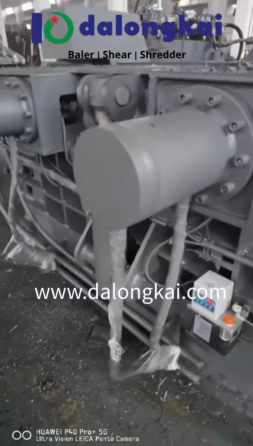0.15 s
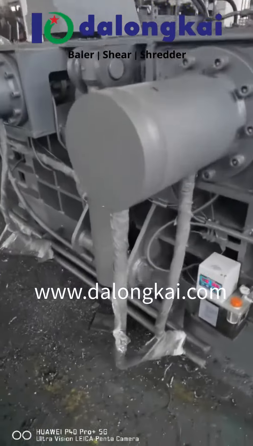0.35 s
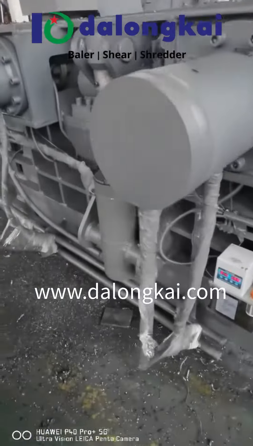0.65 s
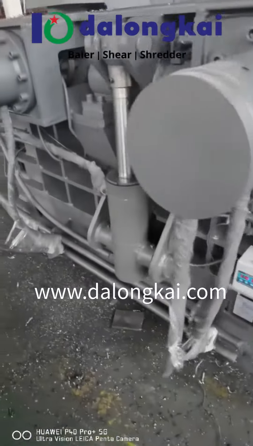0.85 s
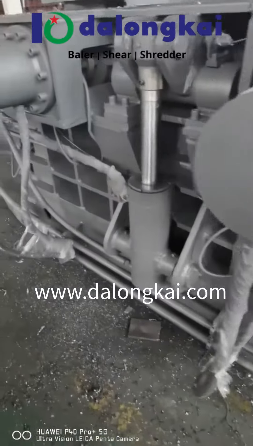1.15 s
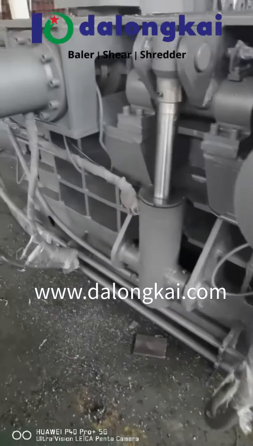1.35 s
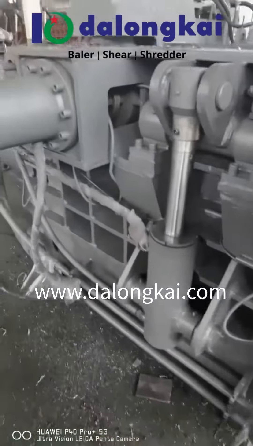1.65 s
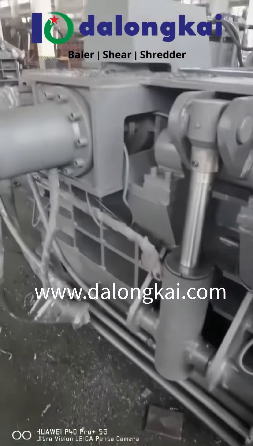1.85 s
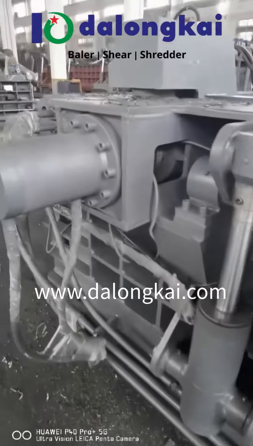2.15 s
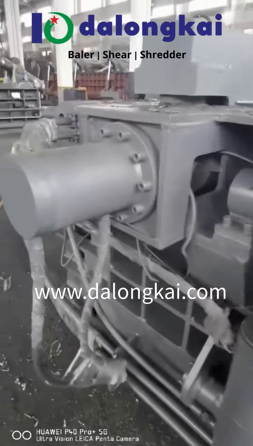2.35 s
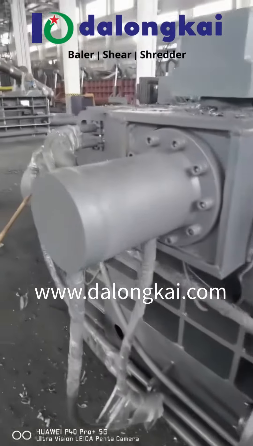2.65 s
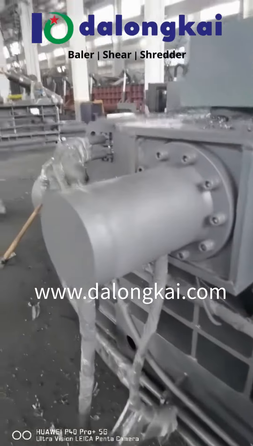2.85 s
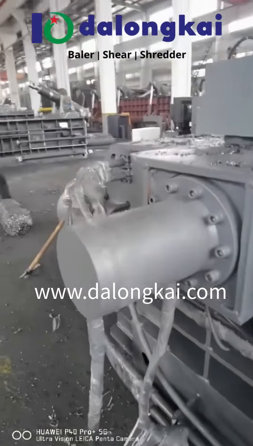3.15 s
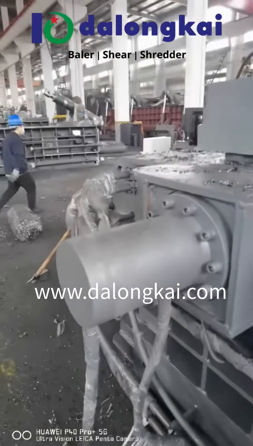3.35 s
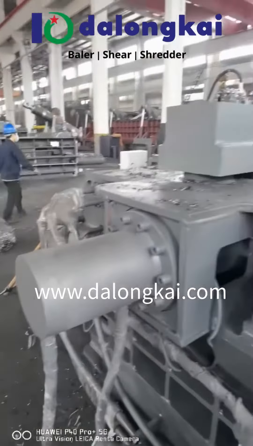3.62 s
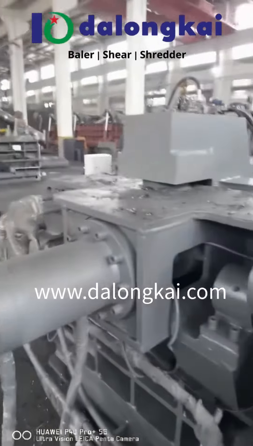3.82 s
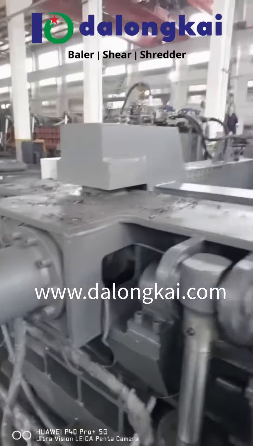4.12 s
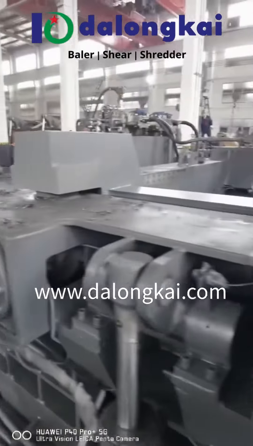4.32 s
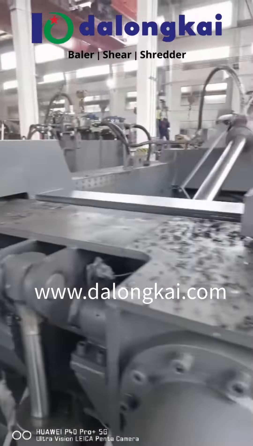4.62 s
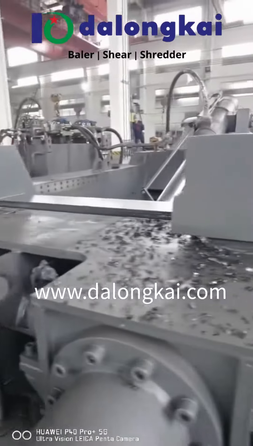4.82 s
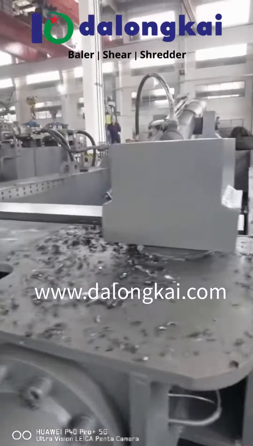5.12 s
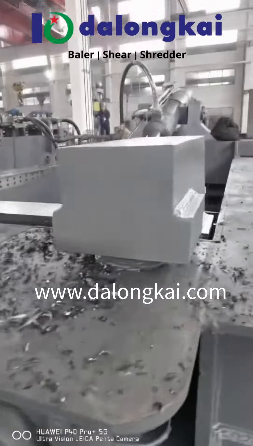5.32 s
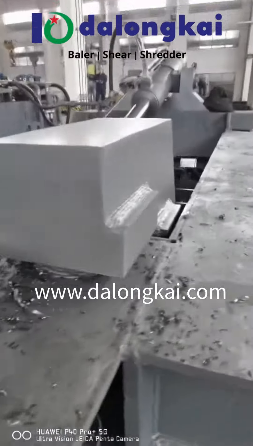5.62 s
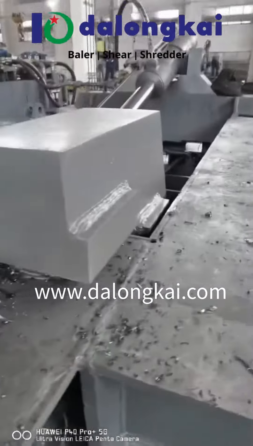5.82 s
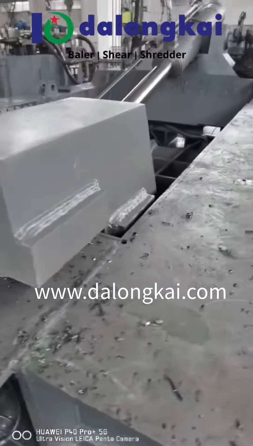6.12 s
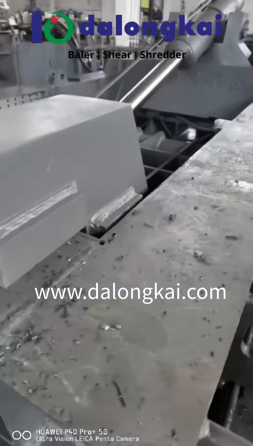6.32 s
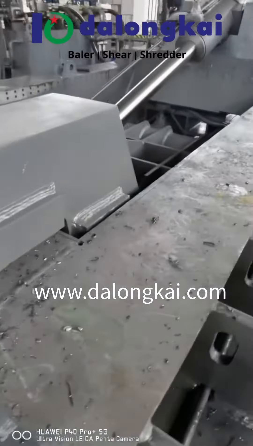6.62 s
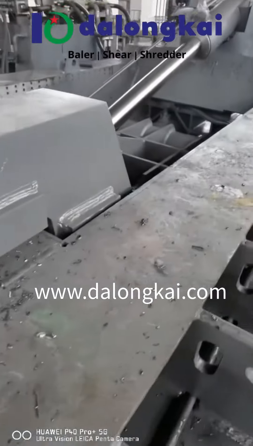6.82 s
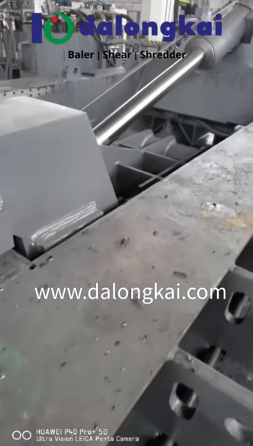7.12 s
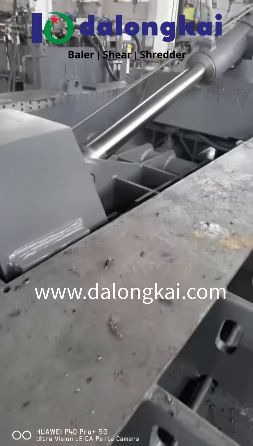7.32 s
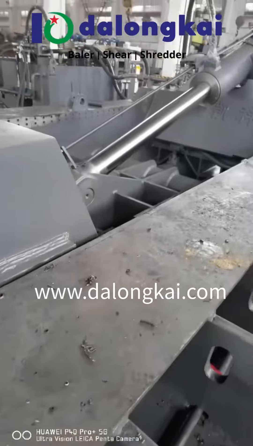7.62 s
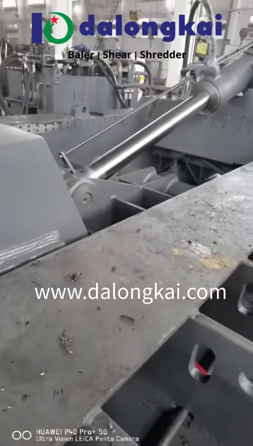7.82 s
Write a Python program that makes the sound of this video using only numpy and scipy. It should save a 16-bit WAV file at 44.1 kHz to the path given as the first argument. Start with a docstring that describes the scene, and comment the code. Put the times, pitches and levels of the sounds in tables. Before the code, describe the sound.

A hydraulic pump whines throughout at one fairly low, unchanging pitch with buzzing overtones, over the soft, dark roar of a large factory hall. As the microphone moves, the whine swells and fades and its overtones shimmer. It dips around 1 second, stays mostly strong from 1.5 to 5.7, drops briefly at 6, returns, then sinks from about 7 before rising at the very end.

At the start, a faint, high ring of steel dies away within a second or two. Shoes crunch on metal chips with small, bright snaps and scuffs right at the beginning and near 1.1, 1.7 and 2.1 seconds, more faintly near 2.6 and 5.2, and again just after 6. A soft, distant hiss runs until about 2.2 seconds, fades into the hall, and builds again from 5.5 seconds to the end.

```python
"""Hydraulic pump in a steel hall

A nine-piston pump whines at constant speed. The listener walks through its standing waves, so every
overtone swells and fades on its own. Shoes crunch on metal chips, struck steel rings away, and a far
hiss stops and starts again over the roar of the hall."""
import sys
import numpy as np
from scipy import signal
from scipy.io import wavfile
from scipy.ndimage import uniform_filter1d

SR = 44100
rng = np.random.default_rng(int(sys.argv[2]) if len(sys.argv) > 2 else 0)


def transcribe(signal):
    """Save signal, clipped to [-1, 1], as a 16-bit WAV file at the path in sys.argv[1]."""
    frames = np.atleast_2d(signal).T
    limited = np.clip(frames, -1, 1)
    pcm = np.round(limited * 32767).astype(np.int16)
    wavfile.write(sys.argv[1], SR, pcm)


N = 351477

SHAFT_HZ, PISTONS, WALK_M_PER_S = 31.86, 9, 0.55
HISS_BUILD_S, HALL_T60_S, LEAK_DB = 0.52, 0.97, -55
SCUFF_DECAY_S, HIGH_CUT_HZ = 0.058, 13990

# The piston tone along the walk. Each row: time in seconds, level in dB.
PISTON_TONE = [(0.0, -10), (0.24, -8.5), (0.47, -9), (0.8, -27), (1.04, -21.5), (1.15, -25), (1.31, -16.5),
               (1.6, -12), (2.2, -13.5), (2.4, -8.5), (3.37, -8), (3.88, -11.5), (4.02, -9), (4.37, -11.5),
               (4.9, -7.5), (5.13, -14), (5.39, -9), (5.7, -8.5), (5.84, -14), (5.971, -27.5), (6.11, -16),
               (6.32, -8), (6.8, -9), (7.15, -22.5), (7.28, -17.5), (7.58, -33.5), (7.68, -25.5),
               (7.79, -26), (7.93, -15.5)]
# Body of the whine. Each row: time in seconds, levels of harmonics 2 and 3 in dB.
WHINE_BODY = [(0.0, -35, -41), (0.06, -37, -57), (0.31, -54, -44), (0.71, -28.5, -48), (1.4, -51, -43.5),
              (1.86, -35.5, -33.5), (2.15, -32, -27.5), (2.4, -28, -59), (2.57, -43, -54.5),
              (3.62, -39, -36), (4.17, -27, -36), (5.06, -37, -51), (5.19, -44, -35), (5.66, -24, -51),
              (5.86, -57, -70), (6.08, -42, -52), (6.84, -34, -44.5), (7.13, -48, -37.5), (7.5, -28, -39),
              (7.57, -29.5, -57), (7.72, -25.5, -42), (7.97, -36, -51)]
# Its bright edge. Each row: time in seconds, level of harmonic 6 in dB.
WHINE_EDGE = [(0.13, -48), (0.33, -29), (0.44, -39), (0.75, -29.5), (0.85, -37.5), (1.5, -35), (1.7, -49),
              (1.91, -28.5), (2.0, -38), (2.13, -24), (2.33, -41), (2.44, -36.5), (2.58, -43),
              (2.68, -30.5), (3.0, -47), (4.2, -41), (4.35, -37), (5.6, -43), (5.88, -44.5), (5.97, -31.5),
              (6.06, -42), (6.44, -31), (6.5, -43), (6.64, -32), (6.88, -43), (7.28, -31), (7.39, -44),
              (7.55, -30), (7.77, -53), (7.88, -32), (7.97, -49)]
# Its sheen. Each row: time in seconds, levels of harmonics 5 and 8 in dB.
WHINE_SHEEN = [(0.0, -56, -42), (0.26, -40.5, -59), (1.33, -47.5, -35.5), (1.8, -48, -49),
               (2.02, -34, -39.5), (2.22, -44, -48), (2.42, -55, -33), (2.48, -43, -57), (3.24, -35, -32),
               (3.42, -54, -52), (3.75, -42, -47), (3.99, -62, -47), (4.11, -38.5, -57), (4.22, -39.5, -42),
               (5.66, -51, -48.5), (5.73, -61, -40.5), (6.28, -37, -37.5), (6.57, -48.5, -48),
               (7.17, -50, -48), (7.33, -36, -45), (7.97, -52, -51)]
# Faint harmonics: multiples of the piston tone, then their average levels in dB.
FAINT_HARMONICS = [4, 7, 9, 10, 11, 12, 13, 14, 16, 17]
FAINT_DB = [-46.5, -42.5, -44.5, -46, -46.5, -54.5, -55.5, -64.5, -54.5, -54]
# Their shared swell. Each row: time in seconds, relative level in dB.
FAINT_SWELL = [(0.0, -1.5), (1.3, 1.5), (3.2, 2), (3.6, -1.5), (7.97, -1)]
# Shaft tones: multiples of the shaft speed, then their average levels in dB.
SHAFT_ORDERS = [11, 12, 13, 14, 16, 17, 19, 20, 21, 22, 24, 26, 28, 29, 32, 50, 60, 106]
SHAFT_DB = [-47.5, -53.5, -55, -54.5, -44, -40, -39.5, -45.5, -47, -51.5, -52, -58.5, -50.5, -64, -56.5,
            -58, -62, -65]
# Their shared swell. Each row: time in seconds, relative level in dB.
SHAFT_SWELL = [(0.1, -1), (0.33, -14), (0.6, -3), (1.6, 1.5), (5.65, -0.5), (5.9, -11.5), (6.85, 1),
               (7.1, -12.5), (7.6, -3)]
# Steps on chips. Each row: start in seconds, snap gain in dB, snap pitch in Hz, scuff gain in dB.
CRUNCHES = [(0.0398, -18, 5600, -38), (0.077, -29, 5610, -38), (1.0904, -26, 6000, -43),
            (1.745, -15, 5640, -33), (1.787, -28, 5830, -43), (2.129, -20, 6150, -37),
            (2.5506, -31, 11600, -50), (2.572, -36, 10500, -49), (3.301, -52, 5800, -46.5),
            (5.198, -46.5, 5400, -47), (5.247, -35, 5300, -53.5), (6.131, -28, 7850, -40),
            (6.25, -29, 7870, -39)]
# Grit under a sole. Each row: frequency in Hz, relative level in dB.
GRIT_COLOUR = [(3500, -18), (5500, 2), (8200, 1), (11000, -8), (14000, -28)]
# Ringing steel. Each row: pitch in Hz, starting level of the pure tone in dB, T60 in seconds.
STEEL_MODES = [(5600, -44, 2.5), (5330, -52.5, 2), (6060, -45.5, 2.9)]
# Blows of hiss. Each row: opening and shutting times in seconds, target level at each in dB.
HISS_BLOWS = [(-1.0, 2.21, -38, -37.5), (5.5, 8.9, -41, -40)]
# Colour of the hiss. Each row: frequency in Hz, relative level in dB.
HISS_COLOUR = [(2470, -33.5), (4200, -6), (5810, -3.5), (6260, -1.5), (7020, -8), (8160, -2), (9150, -10.5),
               (10800, -13), (12500, -29.5), (13800, -26.5)]
# Roar of the hall. Each row: frequency in Hz, density in dB per Hz.
ROAR_COLOUR = [(25, -83), (62, -74.5), (110, -62), (280, -56), (450, -62.5), (620, -64.5), (950, -75),
               (1300, -81), (1750, -74), (2900, -74), (3700, -81.5), (4700, -77), (6000, -85.5),
               (9000, -101), (12000, -104), (13800, -120)]


def piston_whine():
    """The piston tone and its harmonics, roughened by uneven strokes."""
    pitch = SHAFT_HZ * PISTONS
    out = fuzzy_tone(pitch, gain(ride(PISTON_TONE)), fuzz_db=-25, fuzz_hz=22)
    out += fuzzy_tone(2 * pitch, gain(ride(WHINE_BODY)), fuzz_db=-19, fuzz_hz=25)
    out += fuzzy_tone(3 * pitch, gain(ride(WHINE_BODY, column=2)), fuzz_db=-8.5, fuzz_hz=25)
    bright_db = {5: ride(WHINE_SHEEN), 6: ride(WHINE_EDGE), 8: ride(WHINE_SHEEN, column=2)}
    levels = {k: gain(db) * unit_rms(1 + 0.28 * standing_waves(k * pitch))
              for k, db in bright_db.items()}
    swell = unit_rms(gain(ride(FAINT_SWELL)))
    for k, db in zip(FAINT_HARMONICS, FAINT_DB):
        levels[k] = gain(db) * swell * standing_waves(k * pitch)
    # the high harmonics throb once per turn of the shaft
    throb = 1 + 0.072 * np.cos(2 * np.pi * SHAFT_HZ * np.arange(N) / SR)
    for k, level in levels.items():
        out += throb * fuzzy_tone(k * pitch, level, fuzz_db=-6, fuzz_hz=29)
    return out


def shaft_tones():
    """Unequal pistons add weaker tones at multiples of the shaft speed."""
    out = np.zeros(N)
    # the two neighbours of the piston tone share part of its swell
    swell = unit_rms(gain(0.56 * ride(PISTON_TONE)))
    for k, db in ((PISTONS - 1, -35), (PISTONS + 1, -35.5)):
        level = gain(db) * swell * unit_rms(1.2 + standing_waves(k * SHAFT_HZ))
        out += fuzzy_tone(k * SHAFT_HZ, level, fuzz_db=-9.5, fuzz_hz=20)
    swell = unit_rms(gain(ride(SHAFT_SWELL)))
    for k, db in zip(SHAFT_ORDERS, SHAFT_DB):
        level = gain(db) * swell * unit_rms(1.2 + standing_waves(k * SHAFT_HZ))
        out += fuzzy_tone(k * SHAFT_HZ, level, fuzz_db=-5.5, fuzz_hz=6.1)
    return out


def standing_waves(hz):
    """Complex gain of 24 echoes from all sides, Doppler-shifted by the walk so that they beat."""
    direction, phase = rng.random((2, 24, 1))
    t = np.arange(0, N / SR, 1 / 200)
    shift_hz = hz * WALK_M_PER_S / 343 * np.cos(2 * np.pi * direction)
    echoes = np.exp(2j * np.pi * (shift_hz * t + phase))
    return stretch(unit_rms(echoes.sum(0)))


def footsteps():
    """One metal chip snaps and rings briefly, then the sole scuffs over many small ones."""
    out = np.zeros(N + SR)
    t = np.arange(SR // 4) / SR
    grit = unit_rms(patchy_noise(GRIT_COLOUR, size=256, patchy_db=-1.5))
    snap_envelope = (t / 0.00074) * np.exp(1 - t / 0.0011)
    scuff_envelope = (1 - np.exp(-t / 0.0044)) * np.exp(-t / SCUFF_DECAY_S)
    for start, snap_db, hz, scuff_db in CRUNCHES:
        at = round(start * SR)
        burst = grit[at:at + len(t)]
        ring = np.sin(2 * np.pi * hz * t)
        snap = (0.48 * ring + 0.23 * burst) * snap_envelope
        lumps = gain(2.1 * flicker(len(t), smooth=90))
        chatter = ring * flicker(len(t), smooth=40)  # loose chips rattle at the pitch of the snap
        scuff = (burst + chatter) * lumps * scuff_envelope
        out[at:at + len(t)] += gain(snap_db) * snap + gain(scuff_db) * scuff
    return out[:N]


def struck_steel():
    """The tail of a steel part struck just before the start, its modes blurred by the hall."""
    t = np.arange(N) / SR
    return sum(fuzzy_tone(hz, gain(db - 60 * t / t60), fuzz_db=8, fuzz_hz=110)
               for hz, db, t60 in STEEL_MODES)


def far_hiss():
    """A softly crackling jet: pressure builds, the tail dies in the hall, a leak stays."""
    t, level = np.arange(N) / SR, gain(LEAK_DB)
    for opens, shuts, open_db, shut_db in HISS_BLOWS:
        pressure = 1 - np.exp(-np.maximum(t - opens, 0) / HISS_BUILD_S)
        blow_db = np.interp(t, [opens, shuts], [open_db, shut_db])
        tail_db = -60 * np.maximum(t - shuts, 0) / HALL_T60_S
        level = level + pressure * gain(blow_db + tail_db)
    crackle = gain(0.71 * flicker(N, smooth=150))
    return level * unit_rms(patchy_noise(HISS_COLOUR, size=512, patchy_db=2) * crackle)


def hall_roar():
    """A dark, gently shifting bed of noise."""
    return patchy_noise(ROAR_COLOUR, size=4096, patchy_db=2)


def gain(db):
    return 10 ** (np.asarray(db) / 20)


def unit_rms(x):
    return x / np.sqrt(np.mean(abs(x) ** 2) + 1e-20)


def flicker(length, smooth):
    """Random wobble, averaged over `smooth` samples."""
    return unit_rms(uniform_filter1d(rng.standard_normal(length), size=smooth))


def ride(rows, column=1):
    """A fader ride: one column of a timed table, at every sample."""
    rows = np.asarray(rows)
    return np.interp(np.arange(N) / SR, rows[:, 0], rows[:, column])


def stretch(slow):
    """Spreads a coarse complex series over all samples."""
    return np.interp(np.linspace(0, len(slow) - 1, N), np.arange(len(slow)), slow)


def fuzzy_tone(hz, level, fuzz_db, fuzz_hz):
    """A steady pitch plus a skirt of noise, fuzz_db relative to it and about fuzz_hz wide."""
    hop = 50
    jitter = np.dot(rng.standard_normal((N // hop, 2)), [1, 1j])
    pole = np.exp(-2 * np.pi * fuzz_hz * hop / SR)
    jitter = unit_rms(signal.lfilter([1], [1, -2 * pole, pole ** 2], jitter))
    skirt = gain(fuzz_db) * stretch(jitter)
    carrier = np.exp(2j * np.pi * (hz * np.arange(N) / SR + rng.random()))
    return np.sqrt(2) * (level * (1 + skirt) * carrier).real


def patchy_noise(colour, size, patchy_db):
    """Coloured noise with drifting loud and soft patches, built in frames of `size` samples."""
    hop, hz = size // 4, np.fft.rfftfreq(size, 1 / SR)
    knots_hz, knots_db = np.transpose(colour)
    colour_db = np.interp(np.log(hz + 1), np.log(knots_hz + 1), knots_db)
    real, imag, patches = rng.standard_normal((N // hop + 5, len(hz), 3)).T
    patches = uniform_filter1d(patches, size=9, axis=0)
    patches = unit_rms(uniform_filter1d(patches, size=12, axis=1))
    spectra = (real + 1j * imag) * gain(colour_db[:, None] + patchy_db * patches)
    noise = signal.istft(spectra, nperseg=size, noverlap=size - hop)[1][:N]
    return unit_rms(noise) * np.sqrt(np.sum(gain(colour_db) ** 2) * SR / size)


def scene():
    """All layers over the roar, in mono."""
    mix = hall_roar() + piston_whine() + shaft_tones() + far_hiss() + footsteps() + struck_steel()
    return mix[None]


def record(dry):
    """The microphone drops the deep bass; a steep high cut takes off the air."""
    low_cut = signal.butter(1, 45, "high", fs=SR, output="sos")
    high_cut = signal.firwin(511, HIGH_CUT_HZ, window=("kaiser", 9), fs=SR)
    return signal.oaconvolve(signal.sosfilt(low_cut, dry), high_cut[None], "same")


dry = scene()
out = record(dry)
transcribe(out)
```